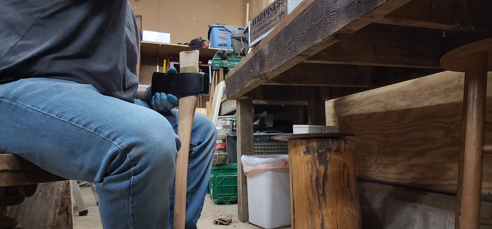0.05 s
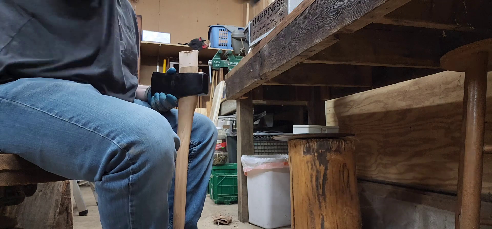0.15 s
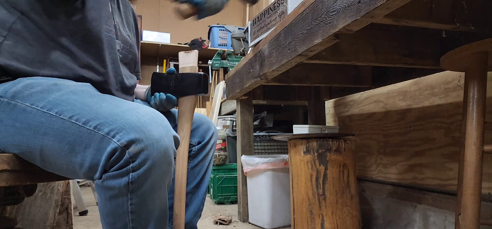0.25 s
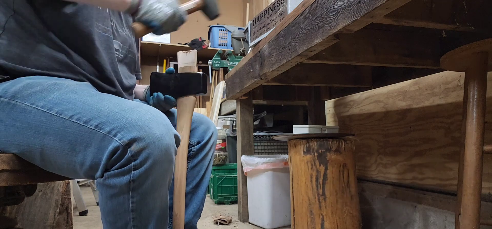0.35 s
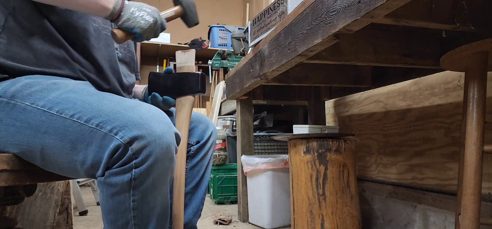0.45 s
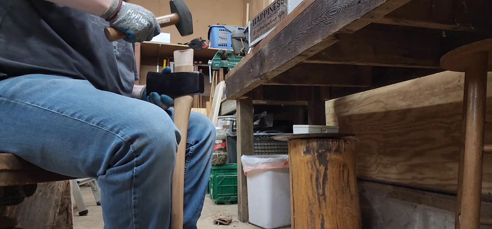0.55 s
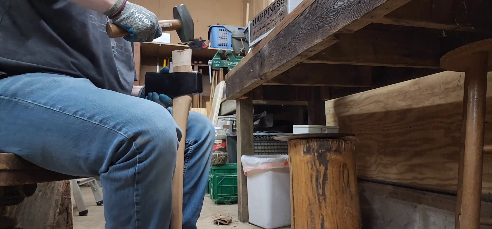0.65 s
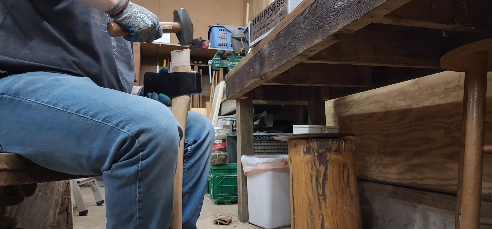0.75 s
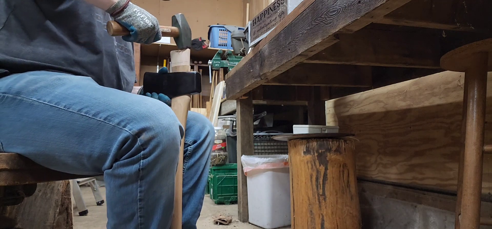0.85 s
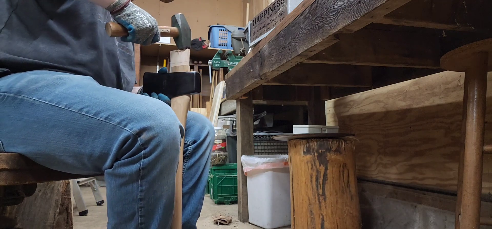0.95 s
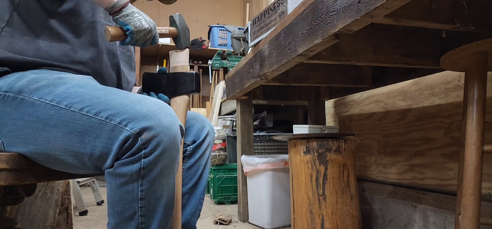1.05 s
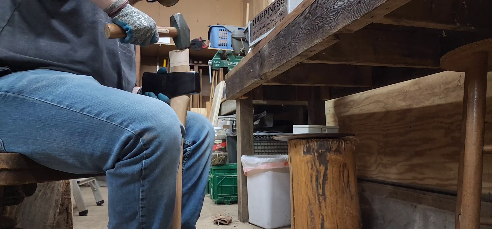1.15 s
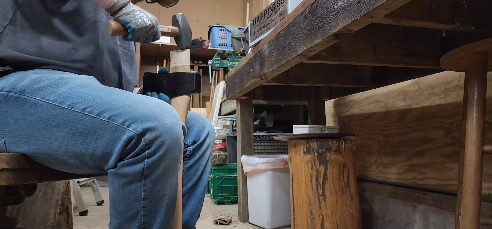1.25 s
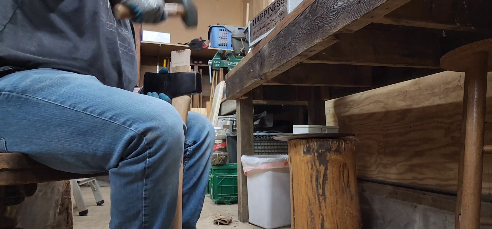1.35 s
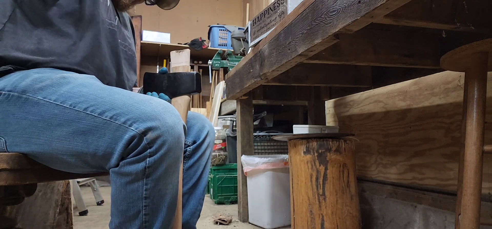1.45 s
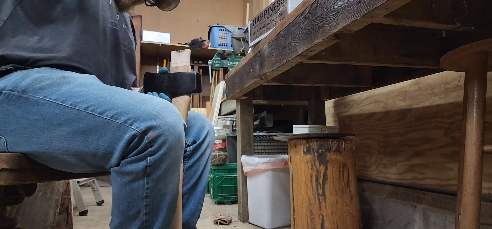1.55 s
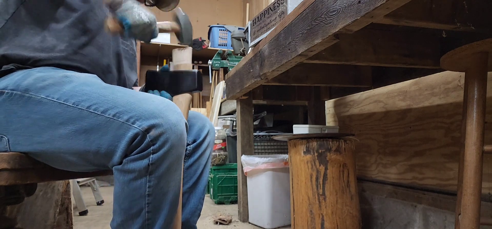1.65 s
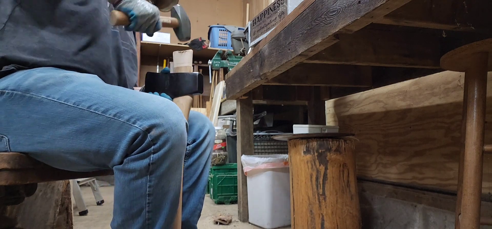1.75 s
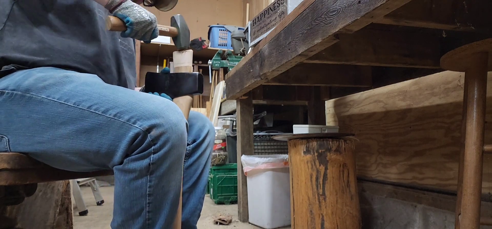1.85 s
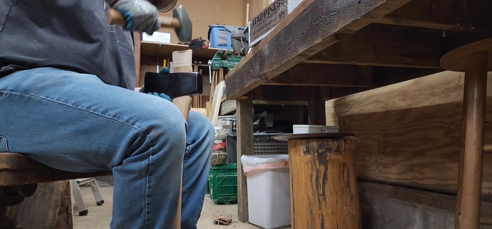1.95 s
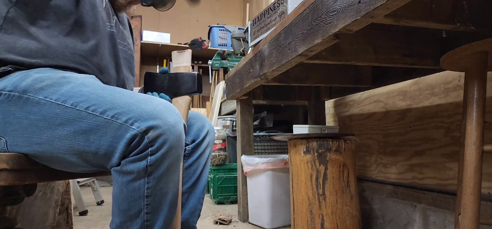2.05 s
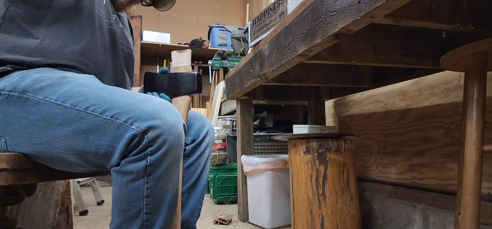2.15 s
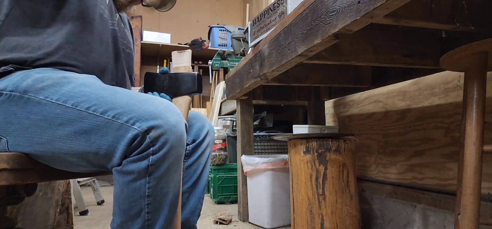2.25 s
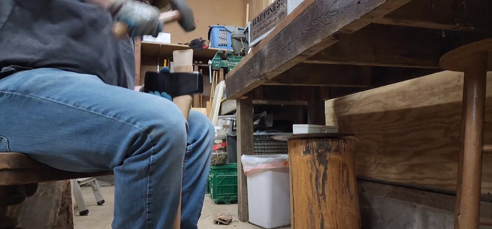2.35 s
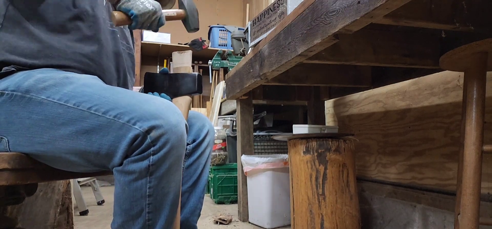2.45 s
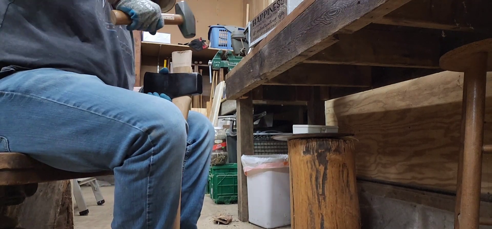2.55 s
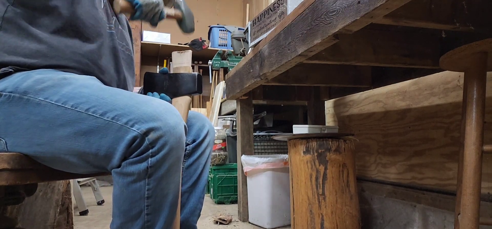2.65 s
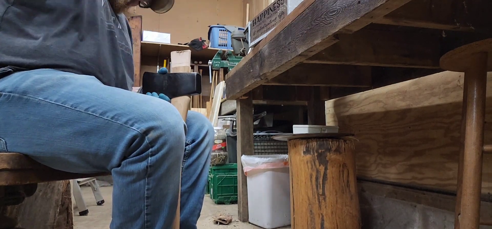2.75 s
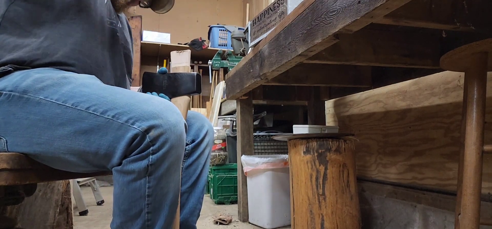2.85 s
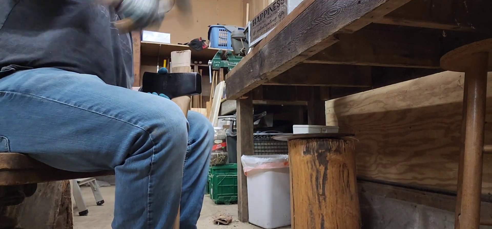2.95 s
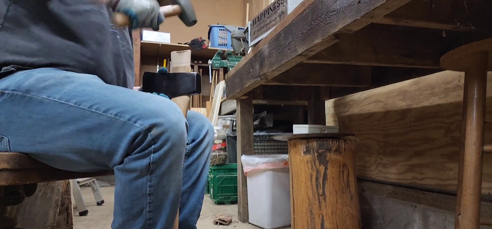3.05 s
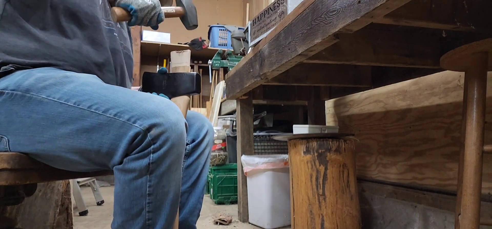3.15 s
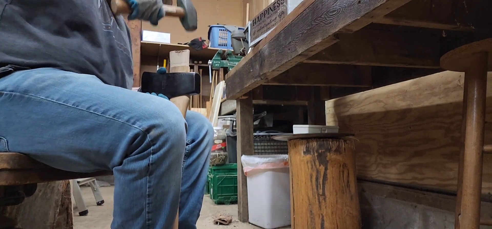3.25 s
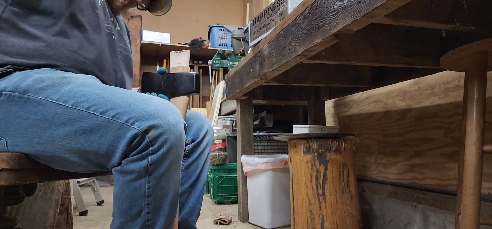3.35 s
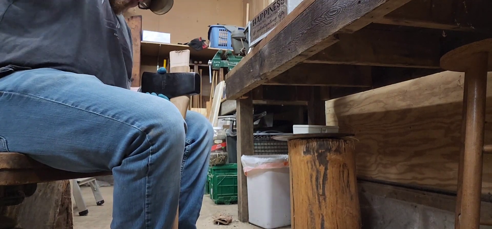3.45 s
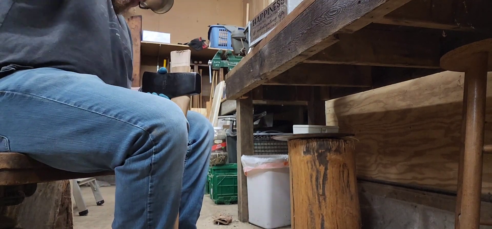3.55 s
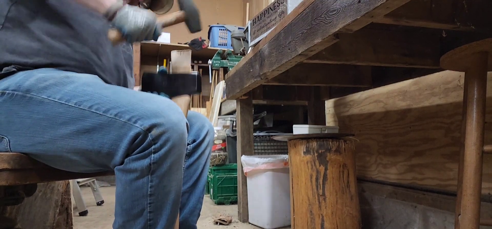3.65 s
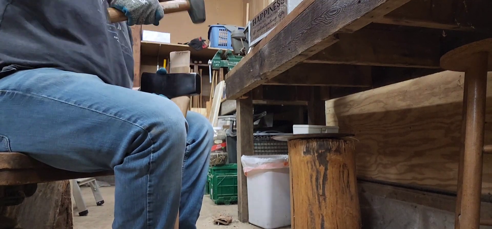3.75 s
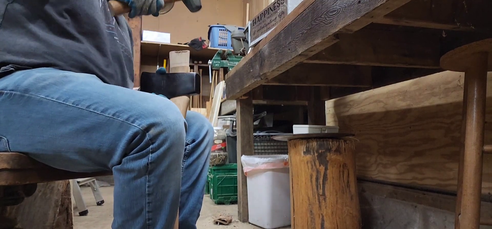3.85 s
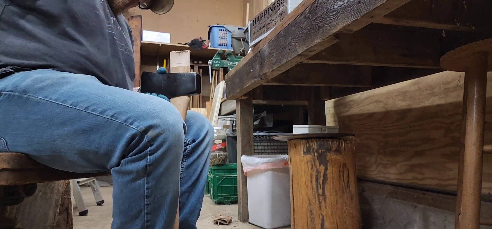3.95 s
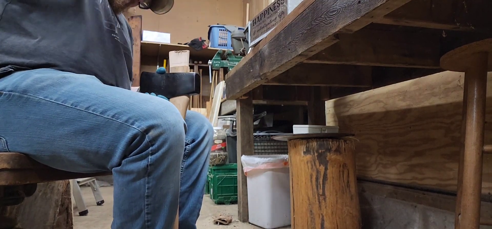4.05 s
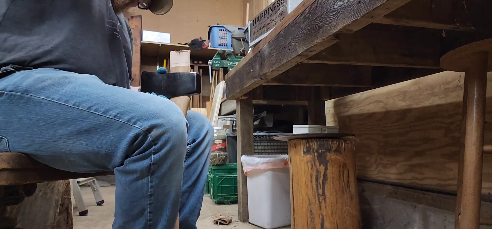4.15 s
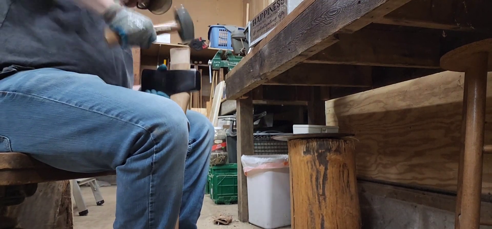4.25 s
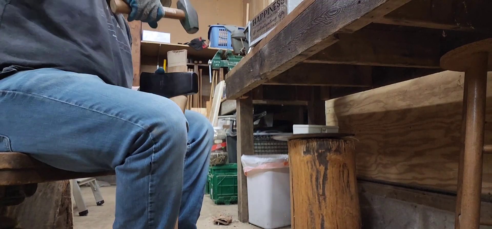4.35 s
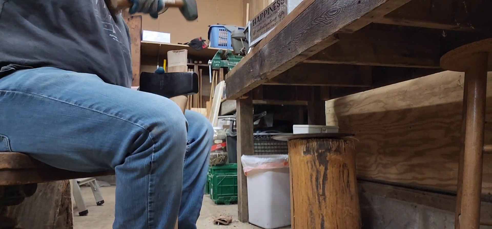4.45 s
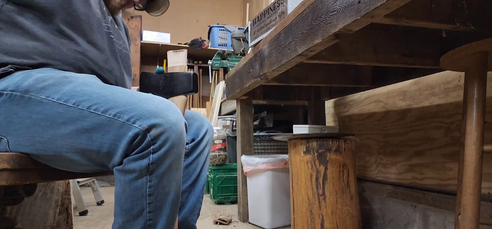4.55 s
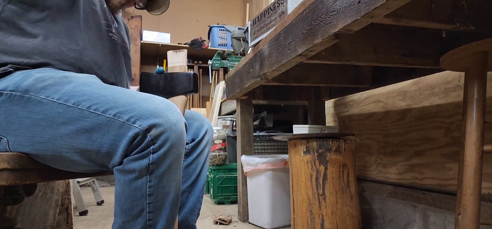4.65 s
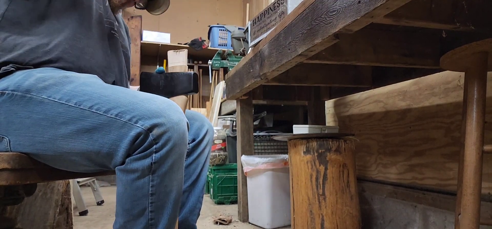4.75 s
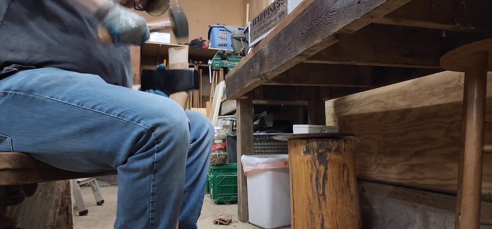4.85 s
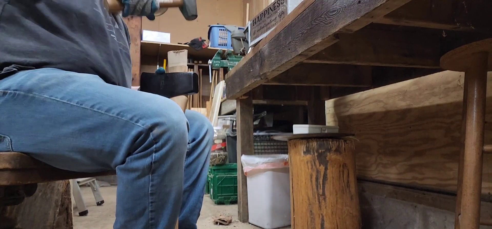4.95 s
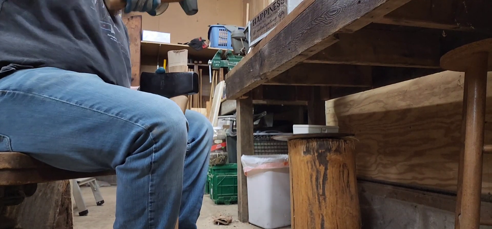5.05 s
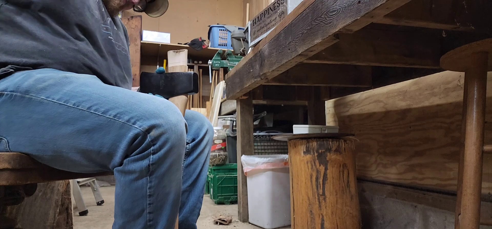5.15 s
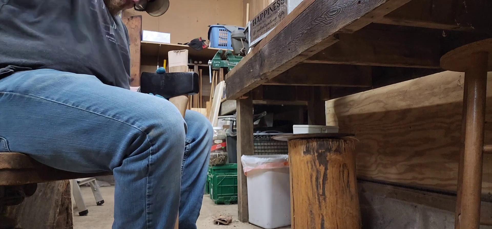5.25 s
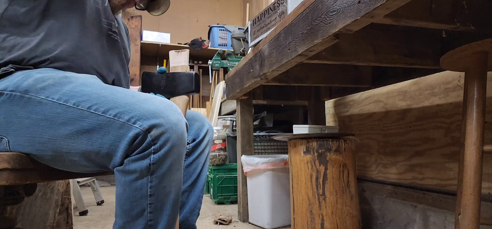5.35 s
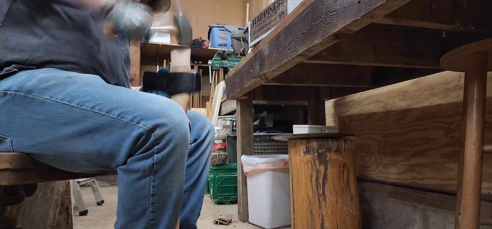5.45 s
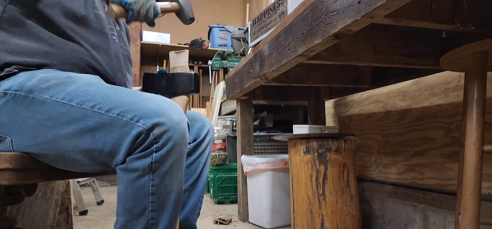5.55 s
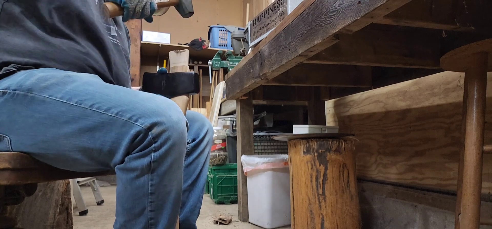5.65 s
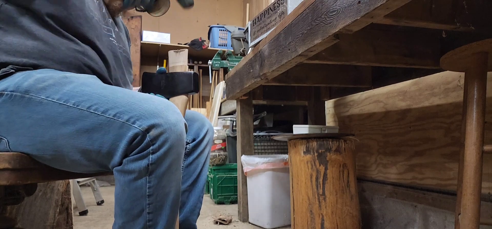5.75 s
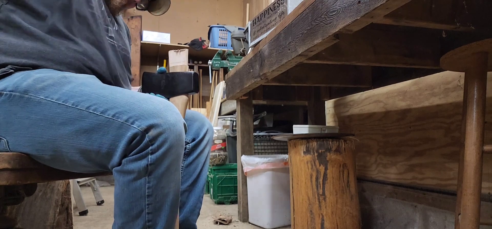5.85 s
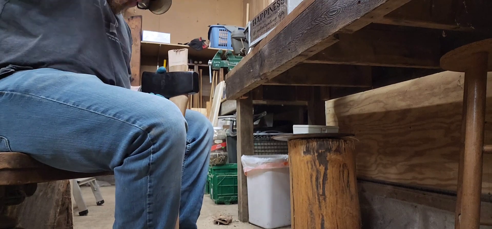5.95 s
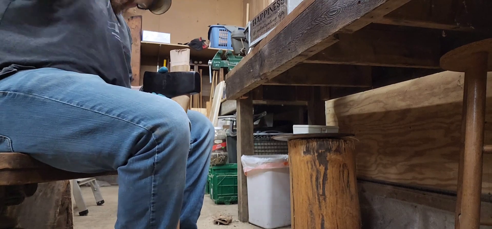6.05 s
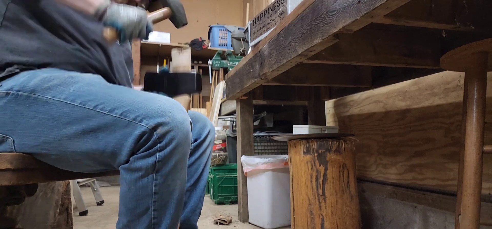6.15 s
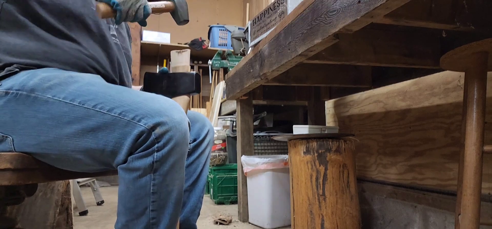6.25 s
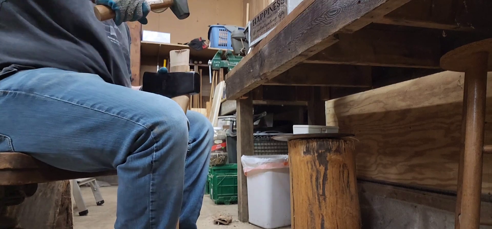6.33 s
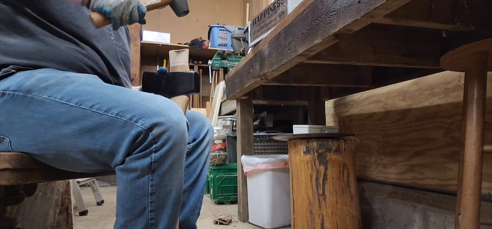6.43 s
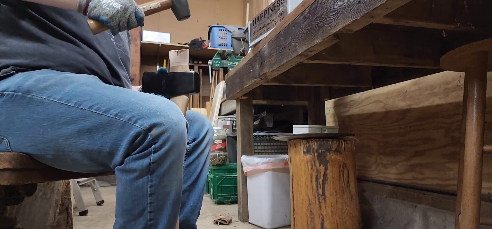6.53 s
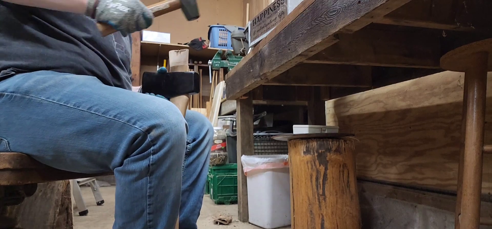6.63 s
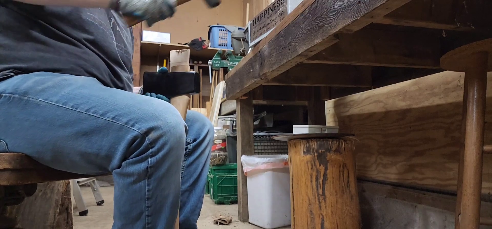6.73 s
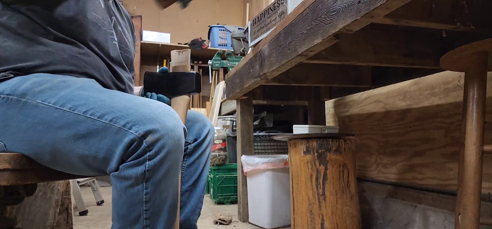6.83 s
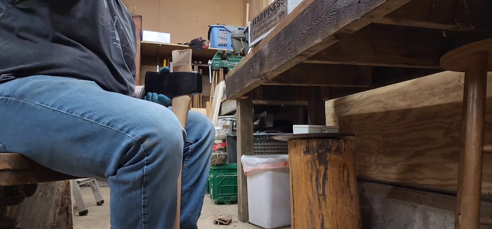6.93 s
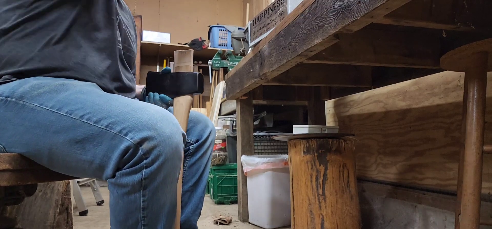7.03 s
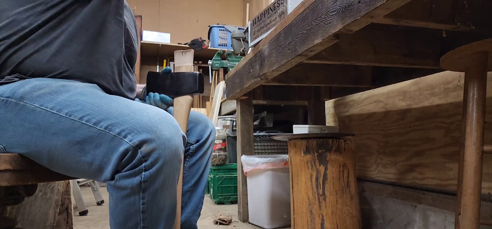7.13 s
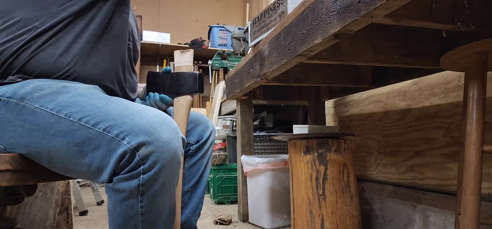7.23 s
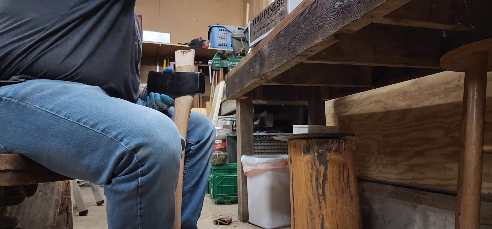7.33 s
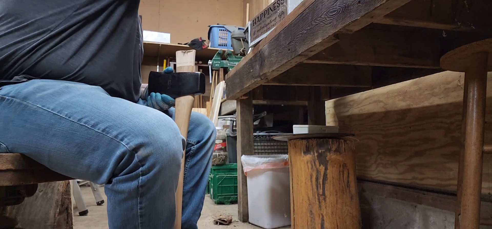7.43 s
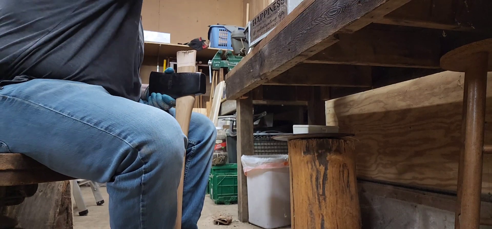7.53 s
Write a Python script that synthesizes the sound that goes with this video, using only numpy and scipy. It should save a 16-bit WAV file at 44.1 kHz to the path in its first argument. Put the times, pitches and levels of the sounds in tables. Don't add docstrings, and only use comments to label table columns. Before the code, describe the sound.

A hammer taps lightly and bounces, then eight hard, evenly spaced blows drive a wooden wedge into an axe handle; the tool clunks down last.

```python
import sys
import numpy as np
from scipy import signal
from scipy.io import wavfile
from scipy.ndimage import uniform_filter1d

SR = 44100
rng = np.random.default_rng(int(sys.argv[2]) if len(sys.argv) > 2 else 0)


def nominal_scale(level):
    x = np.asarray(level, float) / 20
    return 10 ** x


def store_wav(level_fs):
    pcm = np.round(np.clip(np.atleast_2d(level_fs), -1, 1) * 32767)
    wavfile.write(sys.argv[1], SR, pcm.T.astype(np.int16))


N = 334719
HZ = np.fft.rfftfreq(4096, 1 / SR)

# (frequency [Hz], level [dB], width of waver [Hz])
HUM_LINES = [(64.8, -52, 5), (125.6, -48.5, 33), (178.3, -56.5, 3.6), (244, -52.5, 9.6)]
# (frequency [Hz], level [dB per Hz])
FAN_COLOUR = [(15, -41), (25, -25), (55, 4), (92, -13.5), (120, -15.5), (237, -0.5), (320, -14), (684, -14),
              (1380, -22), (3300, -28.5), (6000, -36), (8300, -35.5), (9800, -48.5), (15500, -47)]
# (frequency [Hz], width [Hz], level [dB])
FAN_CASING = [(444.3, 56, 0.5), (833.5, 94, -14), (1125, 17, -9), (1404, 110, -9)]
# (frequency [Hz], likeness [0..1])
FAN_LIKENESS = [(60, 1), (180, 0.84), (550, 0.45), (1650, 0.4), (4970, 0.13), (15000, .15)]
# (time [s], length [s], level [dB], centre frequency [Hz])
RUSTLES = [
    (.3, 0.078, -67, 12500),
    (0.595, 0.11, -69.5, 11000),
    (1.594, 0.14, -54, 11800),
    (3.825, 0.028, -66, 13050),
    (4.152, 0.016, -60, 2200),
]
# (frequency [Hz], t60 [s])
SHOP_DECAY = [(60, 0.94), (160, 0.68), (420, 0.56), (1100, 0.51), (2910, 0.47), (7680, 0.48), (13000, .33)]
# (delay [ms], mid gain [x], side gain [x])
ECHOES = [(1.6, -1.2, 0.89), (3.1, 0.41, -0.26), (5.6, 0.038, 0.38), (6.9, -0.24, -0.62), (10.5, -0.5, 1),
          (15.3, .6, 0.62), (20., -1, -.4)]
# (frequency [Hz], side minus mid [dB])
STRIKE_WIDTH = [(60, -21.5), (110, -28.5), (200, -9.5), (380, -12), (700, -1), (1290, 3), (2380, 0),
                (4400, 2), (8120, 1.5), (15000, 1)]

# (time [s], peak [dB], snap [dB])
TAPS = [
    (0.8138, -15, -41),
    (0.8443, -21.5, -35),
    (0.894, -36, -46),
]
# (frequency [Hz], level [dB], t60 [s])
TAP_WOOD = [(713, -5, 0.036), (954, -1.5, .05), (1014, 0, 0.034), (2035, -14, 0.033), (6400, -20, 0.035),
            (8700, -27, .02)]
# (frequency [Hz], level [dB], t60 [s])
TAP_FLOOR = [(73.5, -3, 0.36), (138, 7, 0.054), (447, -6.5, 0.093)]
# (frequency [Hz], level [dB per Hz])
TAP_COLOUR = [(35, -47), (60, 9), (357, -7.5), (570, -5.5), (1000, -7), (2000, -15.5), (8670, -39),
              (16300, -60)]

# (time [s], peak [dB], steel ring [dB], rattle [dB])
DROPS = [
    (7.3067, -14.5, -28.5, 30),
    (7.362, -30, -47, 33.5),
    (7.411, -39.5, -56, 35.5),
    (7.523, -17.5, -72, 24),
    (7.5885, -17.5, -33, 26.5),
]
# (frequency [Hz], level [dB], t60 [s])
BOARD = [(42.7, -2, 0.87), (105, -4.5, 0.14), (159, -38, 0.36), (253, 17, 0.21), (331, 2, 0.42),
         (478, 9, 0.52), (540, -6.5, 0.23), (556, -17, 0.21)]
# (frequency [Hz], level [dB], t60 [s])
BOARD_EDGE = [(280, 0.5, 0.17), (394.5, -4.5, 0.69), (485, -7, 0.34), (583, -4, 0.2), (695, -11, .2),
              (760, -6.5, 0.22), (1390, -6, 0.1), (1550, -7, 0.044)]
# (frequency [Hz], level [dB], t60 [s], beat [Hz])
TOOL_STEEL = [(4070, -3, 0.4, 9), (4920, -13, .9, 5), (5990, -16, 0.35, 14), (7510, -4, 0.33, 8),
              (7900, -11, 0.25, 20), (9050, -16, 0.25, 15), (9841, -19, 0.33, 12), (10750, -13, 0.36, 12),
              (12600, -21, .25, 10), (13170, -12, 0.29, 8), (14050, -19, .2, 10), (14800, -15, .15, 30),
              (11500, -20, .25, 25), (12000, -22, .3, 30)]
# (frequency [Hz], level [dB per Hz])
DROP_COLOUR = [(35, -42), (60, -5.5), (150, 1.5), (507, -2.5), (900, -15), (1350, -17), (2000, -26.5),
               (4190, -37.5), (7000, -44), (13500, -57), (16300, -69)]

# (time [s], strength [dB], knock [dB], crack [dB], steel [dB])
BLOWS = [
    (1.636, 3, 3.5, 3, -5),
    (2.2971, 1, 1, 1.5, -4.3),
    (2.9638, 0, 2, 3, -3.5),
    (3.592, -1, -1, -4, -3.5),
    (4.2239, -1, -2, -1, -6.5),
    (4.8284, -1.5, -0.5, -1, -3),
    (5.4421, -1.5, -2, -2.5, -4),
    (6.083, -1.5, -1, 1, -3),
]
# (frequency [Hz], level [dB], t60 [s])
FLOOR = [(49.2, -12, 0.83), (75.3, -5, 0.39), (140, -13, 0.45), (228.5, -10, 0.51), (296.2, -1.5, 0.19),
         (337, -18.5, 0.32), (405, -15.5, 0.45), (440, -2.5, 0.38), (488.4, -11.5, .35), (523, -18, 0.39)]
# (frequency [Hz], level [dB], t60 [s])
HANDLE = [(640, -17, 0.049), (856, -6, 0.061), (894, -10, 0.07), (1015, -3, 0.019), (1106, -9, .04),
          (1266, -12, 0.0091), (1498, -8, 0.033), (1693, -7, 0.18), (1680, -16.5, 0.037), (1842, -2, 0.023),
          (2577, -17.5, 0.15), (4680, -14.5, .04), (5460, -21.5, 0.092), (7720, -19, .03)]
# (frequency [Hz], level [dB], t60 [s])
WEDGE = [(686, -7.5, 0.082), (852, -5, .12), (911, 1, .14), (1014.6, 1, .1), (1124, -1.5, 0.15),
         (1300, -2.5, .07), (1423, 1.5, .08), (1495, -2, .1), (1628, -4, 0.055)]
# (frequency [Hz], level [dB per Hz])
BLOW_COLOUR = [(35, -20), (150, -7), (200, -7), (280, -9), (450, -9), (700, -15), (1300, -26),
               (2000, -27.5), (3000, -30.5), (5000, -31.5), (7500, -35), (9870, -45.5), (12400, -38.5),
               (15500, -47)]
# (frequency [Hz], width [Hz], depth [dB])
BLOW_GAPS = [(206, 30, -8.5), (260, 17, -3.5), (403.6, 18, -3.5), (540, 23, -4.5), (656, 50, -6.5),
             (764, 40, -4), (881, 23, -7)]
# (frequency [Hz], level [dB per Hz])
SNAP_COLOUR = [(200, -26.5), (600, -10.5), (1300, 2), (1700, -8), (2200, -16.5), (3200, -18.5), (5000, -16),
               (7500, -20.5), (9800, -34), (12400, -28), (15500, -24.5)]
# (frequency [Hz], level [dB per Hz])
TICK_COLOUR = [(1500, -33), (4000, -5.5), (7000, 0), (9800, -6.5), (12400, -4), (15500, -6)]
# (frequency [Hz], level [dB], t60 [s])
HEAD_LOW = [(1660, -1, .4), (1680, -3, .4), (1696, 0, .6), (1698, 0, .6), (1729, -3, .4), (2528, -11, .7),
            (2580, -9, .35)]
# (frequency [Hz], level [dB], t60 [s])
HEAD_HIGH = [(2504, -3, 0.15), (3510, -2, 0.57), (4300, -9, .25), (4500, -7.5, .12), (5560, -10, .15),
             (6270, -9.5, .2), (7450, -10, .15)]


def evened(x):
    return x / np.sqrt(np.mean(x ** 2) + 1e-20)


def read(points, hz):
    f, value = np.transpose(points)
    return np.interp(np.log(hz + 1), np.log(f + 1), value)


def peak_shape(hz, centre, width):
    return 1 / (1 + (2 * (hz - centre) / width) ** 2)


def add(mix, s, sound):
    part = mix[..., round(s * SR):][..., :sound.shape[-1]]
    part += sound[..., :part.shape[-1]]


def causal(db):
    log_gain = np.log(nominal_scale(np.maximum(db, -100)))
    mirrored = np.concatenate([log_gain, log_gain[-2:0:-1]])
    return np.fft.ifft(np.exp(np.conj(signal.hilbert(mirrored)))).real[:2048]


def hum():
    out, t = np.zeros(N), np.arange(N) / SR
    slow_t = t[::64]
    for f, db, width in HUM_LINES:
        drift = uniform_filter1d(rng.standard_normal((2, len(slow_t))), round(SR / 64 / width))
        strength, turn = evened(drift[0]), evened(drift[1])
        swell = np.interp(t, slow_t, 1.54 + 1.0 * strength)
        phase = np.interp(t, slow_t, 1.2 * turn)
        out += nominal_scale(db) * swell * np.sin(2 * np.pi * f * t + phase)
    return out


def fan():
    fan_db, patch_db = -44.5, 0.58
    frames, hz = N // 512 + 5, np.fft.rfftfreq(1024, 1 / SR)
    a, b, c, d, patches = rng.standard_normal((2 * frames, 513, 5)).T
    patches = evened(uniform_filter1d(uniform_filter1d(patches, 8, 0), 16, 1))
    casing_db = sum(11.8 * peak_shape(hz, f, w) * nominal_scale(db / 4) for f, w, db in FAN_CASING)
    same = np.clip(read(FAN_LIKENESS, hz), -1, 1)[:, None]
    left = a + 1j * b
    right = same * left + np.sqrt(1 - same ** 2) * (c + 1j * d)
    colour_db = (read(FAN_COLOUR, hz) + casing_db)[:, None]
    z = np.array([left, right]) * nominal_scale(colour_db + patch_db * patches)
    air = signal.istft(z, nperseg=1024, noverlap=768, nfft=1024)[1][:, :N]
    return nominal_scale(fan_db) * evened(air)


def gain_db():
    rest_db, deepest_db, bite = 0.5, -14, .48
    hold_s, creep_db_per_s, turn_s = 0.43, 4., .06
    t = np.arange(N) / SR
    out = np.full(N, rest_db)
    for s, *_ in BLOWS:
        now = out[round(s * SR)]
        low = now + bite * (deepest_db - now)
        recovery = low + creep_db_per_s * np.maximum(t - s - hold_s, 0)
        out = np.where(t < s, out, np.minimum(recovery, rest_db))
    turn = round(turn_s * SR)
    return uniform_filter1d(out, turn, origin=turn // 2 - 1)


def rustles():
    out = np.zeros((2, N))
    for s, length, db, hz in RUSTLES:
        t = np.arange(0, 3 * length, 1 / SR)
        catches_db = 3. * rng.exponential(1, len(t) // 64 + 1).repeat(64)[:len(t)]
        grit = rng.standard_normal((2, len(t))) * nominal_scale(catches_db)
        band = signal.butter(2, [0.57 * hz, 1.5 * hz], "band", fs=SR, output="sos")
        add(out, s, nominal_scale(db) * evened(signal.sosfilt(band, grit)) * np.exp(-t / length))
    return out


def ring(modes, rise_s, length_s):
    hz, db, t60 = np.transpose(modes)[:3, :, None]
    t = np.arange(0, length_s, 1 / SR)
    fall = nominal_scale(db - 60 * t / t60) / nominal_scale(db).sum()
    return -fall * np.sin(2 * np.pi * hz * t) * (1 - np.exp(-t / rise_s))


def thud(modes, rise_s, sides):
    waves = ring(modes, rise_s, .6)
    lean = nominal_scale(read(STRIKE_WIDTH, np.array(modes)[:, :1])) * sides
    return np.array([waves.sum(0), (lean * waves).sum(0)])


def random_sides(modes):
    return rng.choice([-1., 1.], (len(modes), 1))


def snap(tone_db, rise_s, fall_s, side):
    t = np.arange(800) / SR
    envelope = (1 - np.exp(-t / rise_s)) * np.exp(-t / fall_s)
    grit = rng.standard_normal((2, 800)) * envelope * [[1], [side]]
    out = signal.fftconvolve(grit, causal(tone_db)[None, :512], axes=1)
    return out / np.linalg.norm(out[0])


def shop(wet_db, near_db, near_share):
    hz, t = np.fft.rfftfreq(256, 1 / SR)[:, None], np.arange(420) * 64 / SR
    z = rng.standard_normal((2, 129, 420)) + 1j * rng.standard_normal((2, 129, 420))
    t60 = read(SHOP_DECAY, hz)
    long_tail = nominal_scale(wet_db - 60 * t / t60)
    near_tail = nominal_scale(near_db - 60 * t / (near_share * t60))
    out = signal.istft(z * (long_tail + near_tail), nperseg=256, noverlap=192)[1] / 16
    out *= 1 - np.exp(-np.arange(out.shape[1]) / (0.0026 * SR))
    out[:, 0] += [1, .6]
    for ms, *gains in ECHOES:
        out[:, round(ms * SR / 1000)] += gains
    return out


def burst(tone_db, wood, room):
    click = causal(tone_db)
    mid = wood.copy()
    add(mid, 0, -click / np.linalg.norm(click))
    side = signal.fftconvolve(mid, causal(read(STRIKE_WIDTH, HZ))[:256])[:len(mid)]
    out = signal.fftconvolve(room, np.array([mid, side]), axes=1)[:, :SR * 6 // 10]
    return out / np.linalg.norm(out[0, :4000])


def taps():
    out, room = np.zeros((2, N)), shop(-19.0, -18.0, 0.33)
    snap_db_per_hz = [(1000, -2), (3500, -16), (6500, -3.5), (9000, -6.5), (11000, -16.5), (15000, -14.0)]
    floor = thud(TAP_FLOOR, 0.0029, random_sides(TAP_FLOOR))
    wood = nominal_scale(-24.0) * ring(TAP_WOOD, 0.00039, .1).sum(0)
    for s, db, snap_db in TAPS:
        air = burst(read(TAP_COLOUR, HZ), wood, room)
        add(out, s, nominal_scale(db) * (nominal_scale(3.5) * floor + nominal_scale(14.5) * air))
        direct_wood = ring(TAP_WOOD, 0.0012, .1).sum(0) * [[1], [.4]]
        add(out, s + 0.0029, nominal_scale(db + 2.0) * direct_wood)
        add(out, s, nominal_scale(snap_db + 8.5) * snap(read(snap_db_per_hz, HZ), .0005, .002, 1.0))
    return out


def set_down():
    out, room = np.zeros((2, N)), shop(-21.5, -15.5, 0.43)
    twins = [(f + beat, db - 5., t60) for f, db, t60, beat in TOOL_STEEL]
    steel = ring(TOOL_STEEL, 0.014, .3).sum(0) + ring(twins, 0.011, .3).sum(0)
    echo = signal.fftconvolve(steel[None], room / np.linalg.norm(room[0]), axes=1)[:, :len(steel)]
    steel = steel * [[1], [.6]] + .3 * echo
    landings = (BOARD, BOARD, BOARD, BOARD_EDGE, BOARD)
    for (s, db, steel_db, rattle_db), boards in zip(DROPS, landings):
        low = thud(boards, 0.0016, random_sides(boards))
        rattle = burst(read(DROP_COLOUR, HZ), np.zeros(3000), room)
        add(out, s, nominal_scale(db) * (-nominal_scale(5.0) * low + nominal_scale(rattle_db - 2.0) * rattle))
        add(out, s, nominal_scale(steel_db - 3.0) * steel)
    return out


def axe_head():
    high_db, high_spread_db = -25, -1
    low_db, low_knock = -22., .1
    tick_db, tick_rise_s, tick_fall_s = -3., .0002, 0.00031
    out = np.zeros((2, N))
    chance = rng.standard_normal((len(BLOWS), len(HEAD_HIGH), 3))
    low = ring(HEAD_LOW, 0.0073, 0.4).sum(0) * [[1], [.5]]
    for (s, db, knock, crack, steel), luck in zip(BLOWS, chance):
        detune, level_shift = 1 + [.004, 0, 0] * luck, [0, high_spread_db, 0] * luck
        waves = ring(np.array(HEAD_HIGH) * detune + level_shift, .002, 0.26)
        lean = np.tanh(luck[:, 2:])
        high = np.array([waves.sum(0), (lean * waves).sum(0)])
        add(out, s, nominal_scale(db + steel + high_db) * high)
        add(out, s, nominal_scale(db + low_db + low_knock * knock) * low)
        aim = [(8000, 0.0018), (11000, 1.8 * crack - steel)]
        tick = snap(read(TICK_COLOUR, HZ) + read(aim, HZ), tick_rise_s, tick_fall_s, .8)
        add(out, s, nominal_scale(tick_db + 1.1 * steel) * tick)
    return out


def hammer():
    thump_db, thump_squeeze = 0.22, .15
    snap_db, snap_follows = 9.5, 0.25
    tint_peak_db, tint_width_hz = 4, 160
    out = np.zeros((2, N))
    room, other_room = shop(-20.0, -22.5, 0.45), shop(-17.5, -15.0, 0.45)
    sides = random_sides(FLOOR)
    gaps_db = sum(db * peak_shape(HZ, f, w) for f, w, db in BLOW_GAPS)
    tints = tint_peak_db * peak_shape(HZ, np.array(HEAD_HIGH)[:, :1], tint_width_hz)
    for s, db, knock, crack, steel in BLOWS:
        tint_db = rng.uniform(0.067, 1.0, len(tints)) @ tints
        thump = thump_db - thump_squeeze * db
        aim = [(250, thump), (1100, knock), (2500, 0.31 * crack), (6000, 1.8 * steel), (12000, crack)]
        floor_modes = [(f * rng.normal(1, .004), d + rng.normal(0, 2.2), t60) for f, d, t60 in FLOOR]
        floor = thud(floor_modes, 0.0022, sides)
        handle_modes = [(f * rng.normal(1, 0.0051), d, t60) for f, d, t60 in HANDLE]
        wood = nominal_scale(knock - 27.5) * ring(handle_modes, 0.00012, 0.16).sum(0)
        shift = rng.uniform(-0.22, 0.24)
        colour_db = read(BLOW_COLOUR, HZ) + read(aim, HZ) + tint_db + gaps_db
        air = burst(colour_db, wood, room + shift * other_room)
        add(out, s, nominal_scale(db) * (nominal_scale(thump - 6.5) * floor + nominal_scale(18.0) * air))
        wedge = ring(WEDGE, 0.00072, 0.526).sum(0) * [[1], [.5]]
        add(out, s, nominal_scale(db + .5 * knock - 8.0) * wedge)
        snap_aim = [(1100, knock), (6000, .5 * steel), (12000, .4 * crack)]
        snap_colour_db = read(SNAP_COLOUR, HZ) + read(snap_aim, HZ) + 0.2 * tint_db
        splinters = snap(snap_colour_db, 0.00031, 0.0088, 1.0)
        add(out, s, nominal_scale(snap_db + snap_follows * db) * splinters)
    return out


def scene():
    mid, side = hammer() + taps() + set_down() + rustles() + axe_head()
    background = (fan() + hum()) * nominal_scale(gain_db())
    return np.array([mid + side, mid - side]) + background


def smear(x):
    smear_db, patch_db = -31., 5.5
    z = signal.stft(x, nperseg=2048, noverlap=1024)[2]
    turn = np.exp(2j * np.pi * rng.random(z.shape))
    bands = evened(uniform_filter1d(rng.standard_normal(z.shape[1:]), size=12, axis=0))
    noise = abs(z) * turn * nominal_scale(smear_db + patch_db * bands)
    return x + signal.istft(noise, nperseg=2048, noverlap=1024)[1][:, :N]


def limit(x):
    knee = .75
    over = np.maximum(abs(x) - knee, 0)
    rounded = np.sign(x) * (knee + (1 - knee) * np.tanh(over / (1 - knee)))
    return np.where(over > 0, rounded, x)


def low_pass(x):
    return signal.sosfilt(signal.butter(12, 16480, fs=SR, output="sos"), x)


def record(dry):
    right_lag, bass_hz, edge_hz = 5, 35., 15900
    late_right = np.pad(dry[1], (right_lag, 0), "edge")[:N]
    bass_cut = signal.butter(2, bass_hz, "high", fs=SR, output="sos")
    held = limit(signal.sosfilt(bass_cut, np.array([dry[0], late_right])))
    band_end = signal.firwin(255, edge_hz, fs=SR)[None]
    finished = signal.oaconvolve(smear(held), band_end, "same")
    return low_pass(finished)


dry = scene()
out = record(dry)
store_wav(out)
```